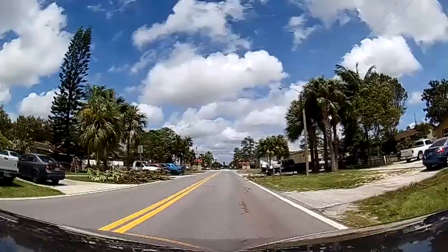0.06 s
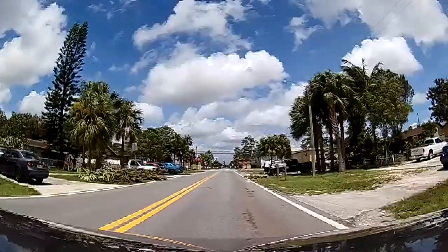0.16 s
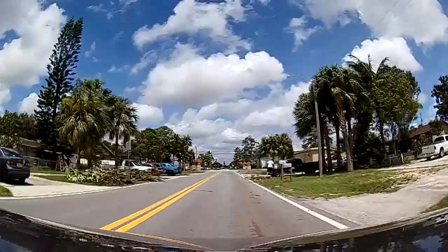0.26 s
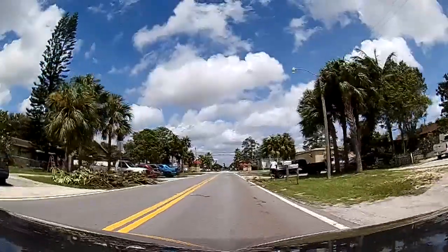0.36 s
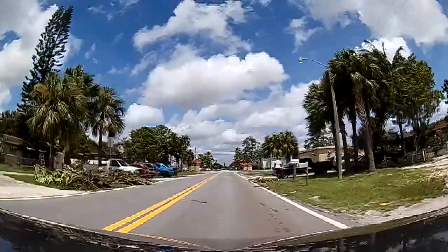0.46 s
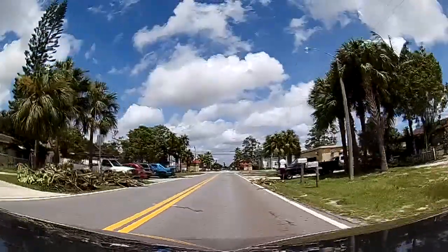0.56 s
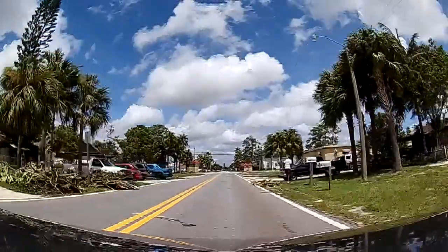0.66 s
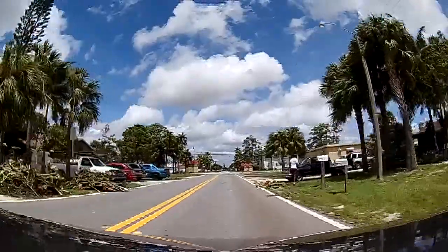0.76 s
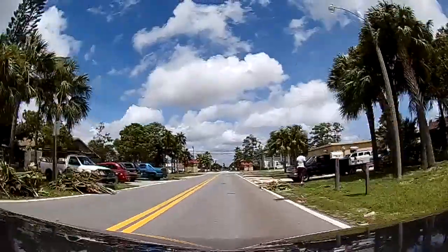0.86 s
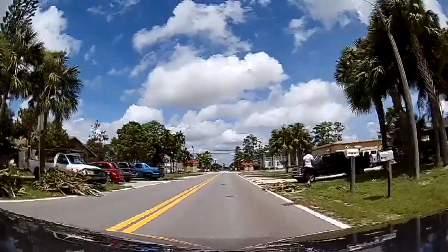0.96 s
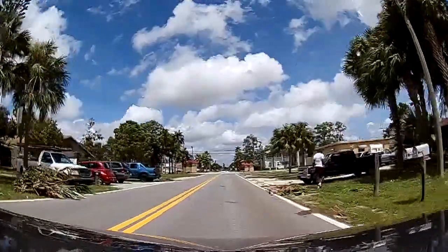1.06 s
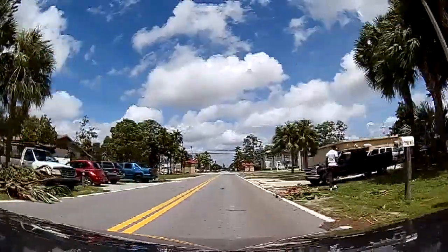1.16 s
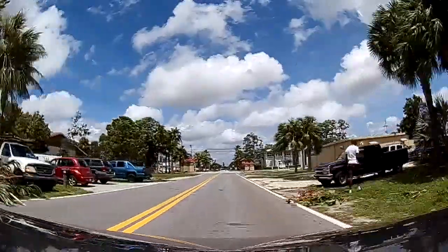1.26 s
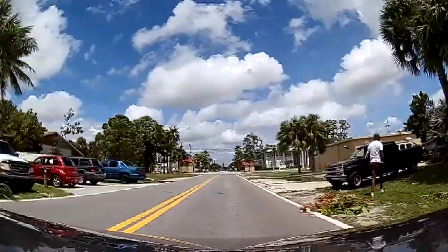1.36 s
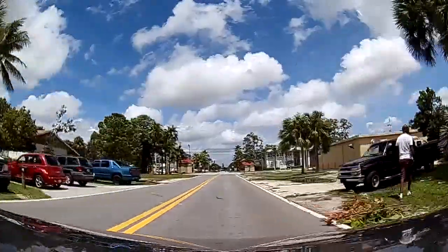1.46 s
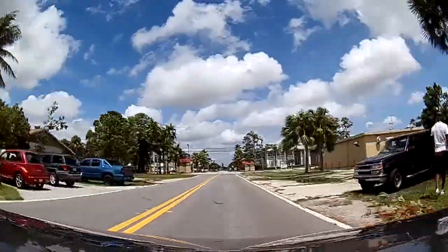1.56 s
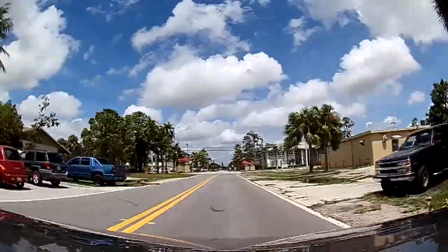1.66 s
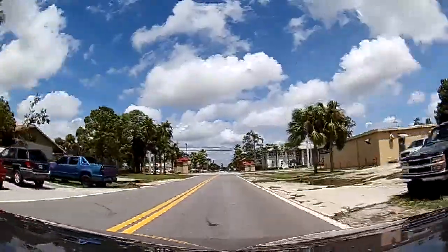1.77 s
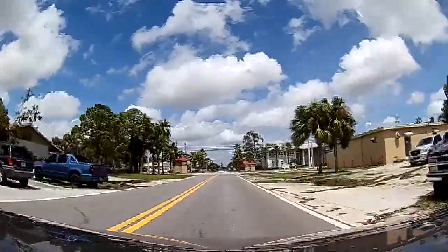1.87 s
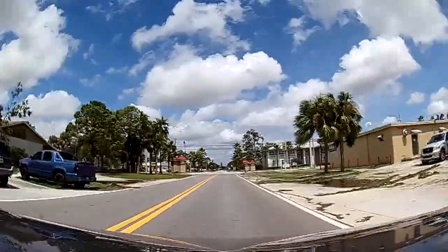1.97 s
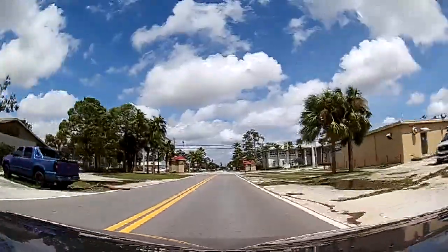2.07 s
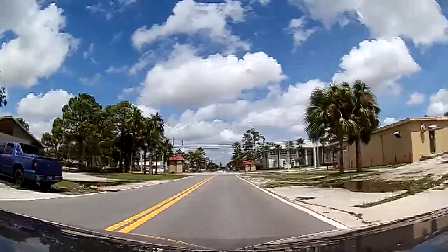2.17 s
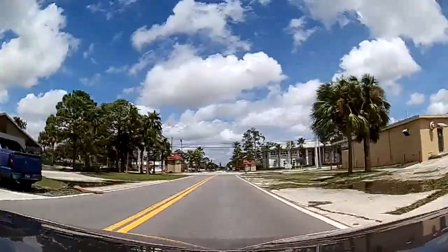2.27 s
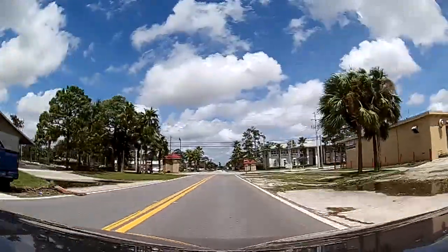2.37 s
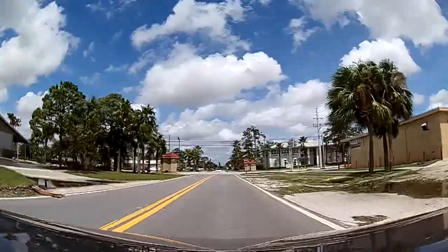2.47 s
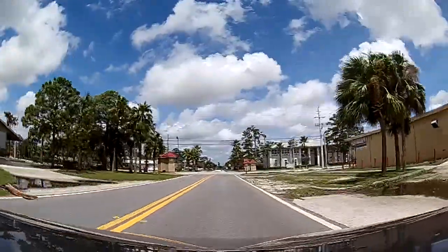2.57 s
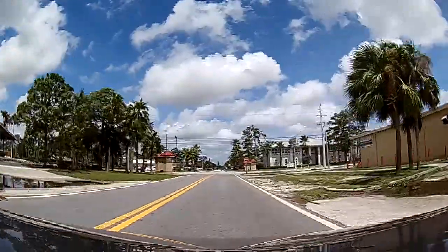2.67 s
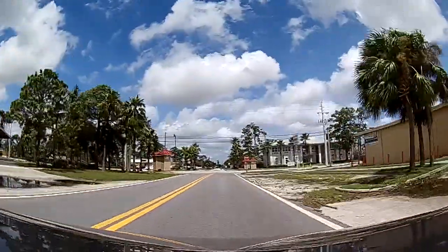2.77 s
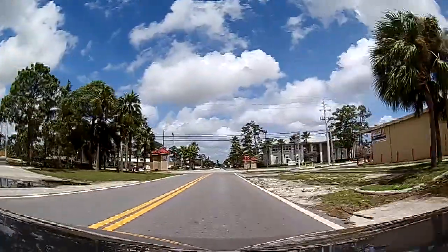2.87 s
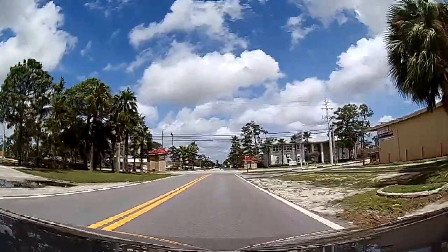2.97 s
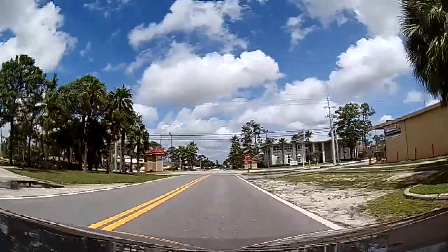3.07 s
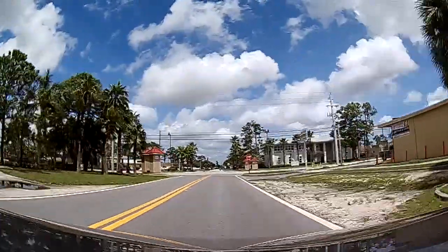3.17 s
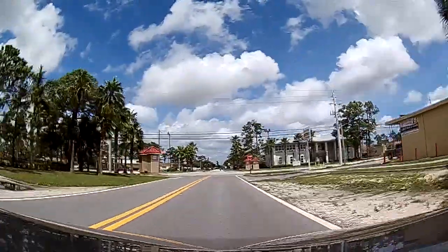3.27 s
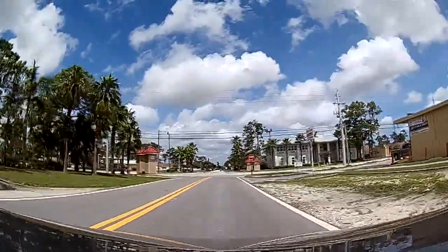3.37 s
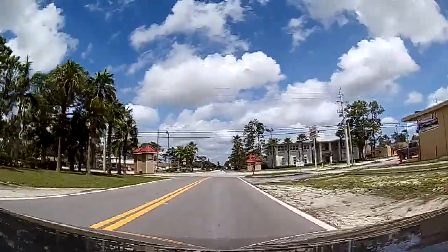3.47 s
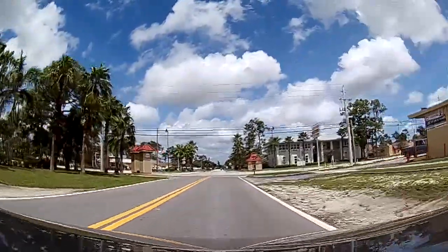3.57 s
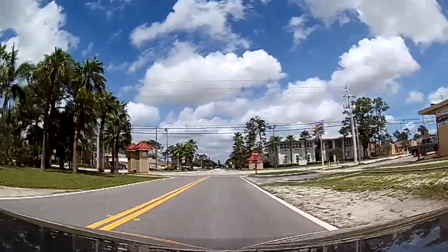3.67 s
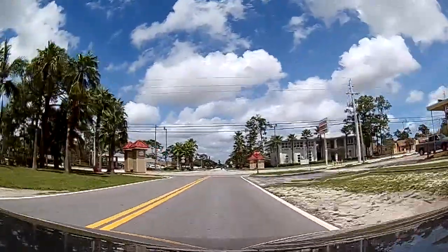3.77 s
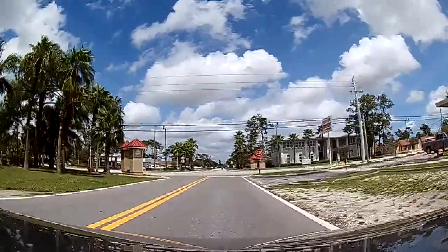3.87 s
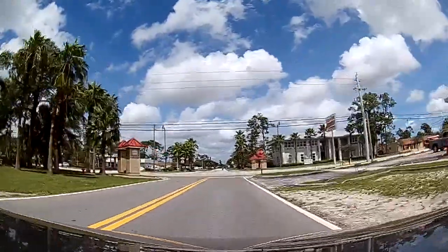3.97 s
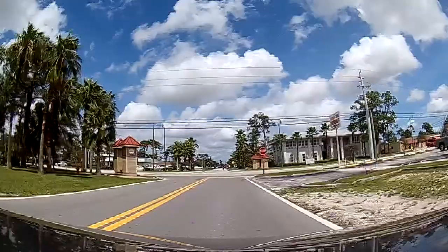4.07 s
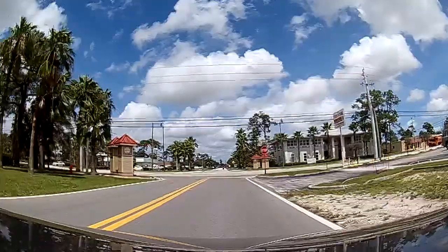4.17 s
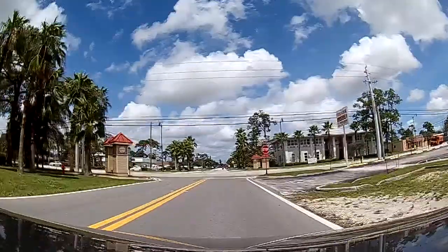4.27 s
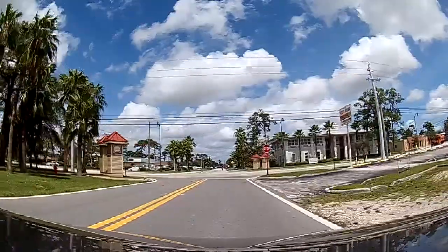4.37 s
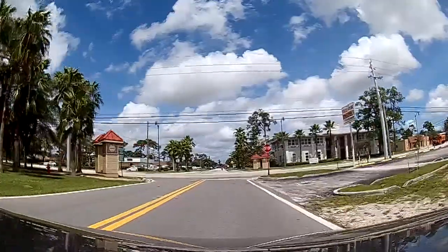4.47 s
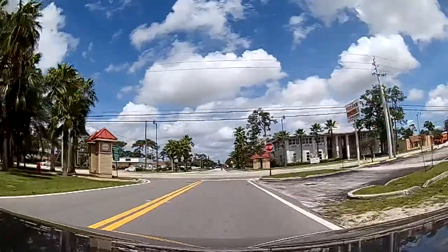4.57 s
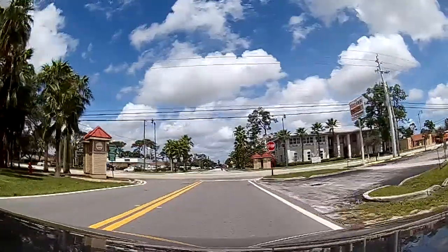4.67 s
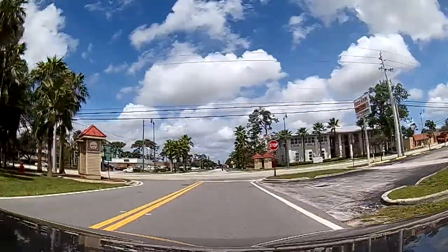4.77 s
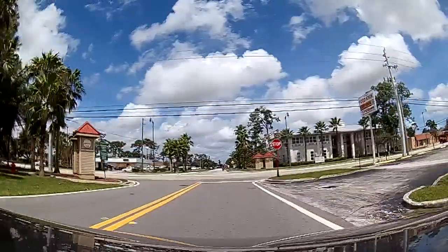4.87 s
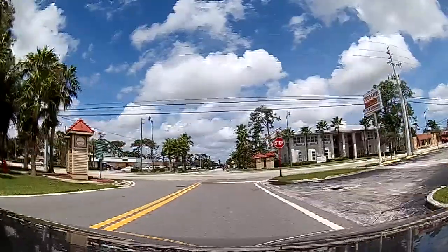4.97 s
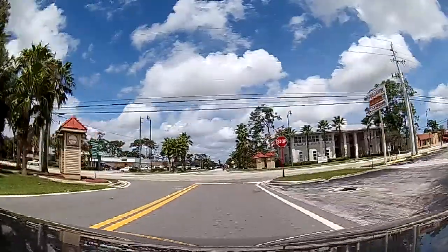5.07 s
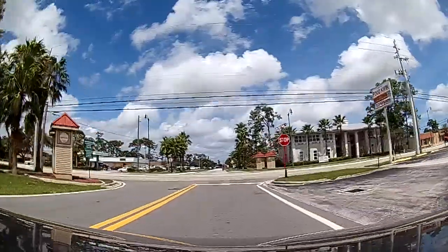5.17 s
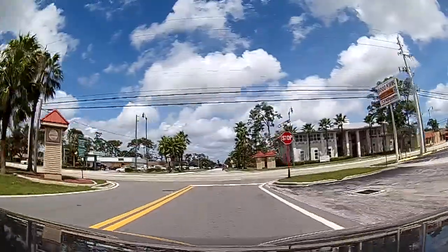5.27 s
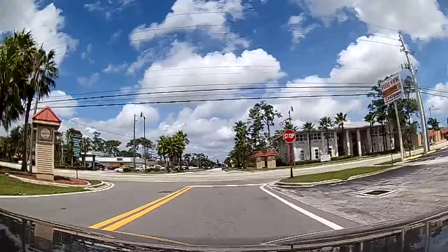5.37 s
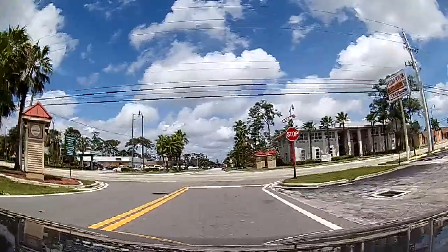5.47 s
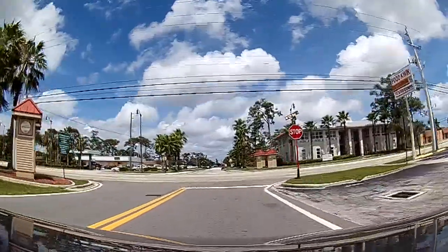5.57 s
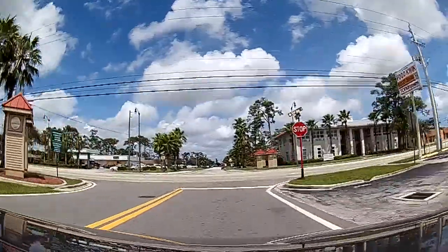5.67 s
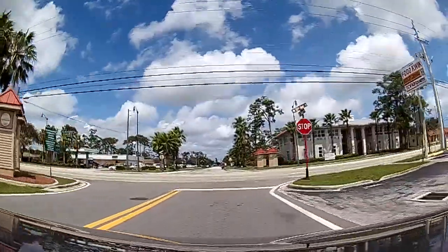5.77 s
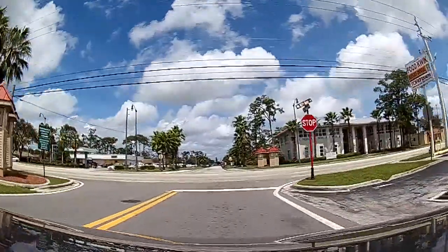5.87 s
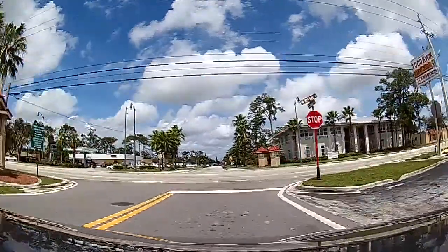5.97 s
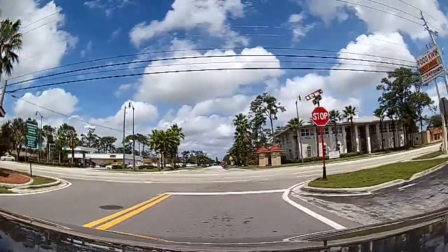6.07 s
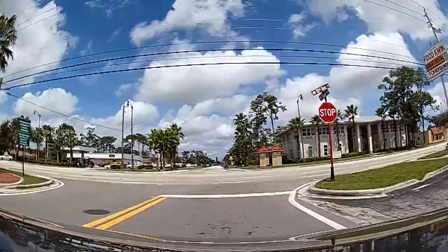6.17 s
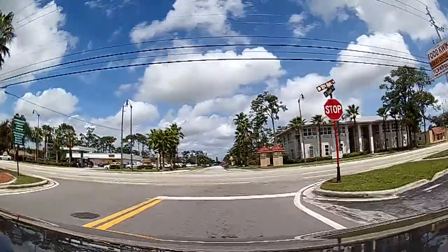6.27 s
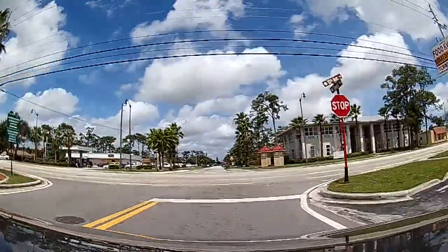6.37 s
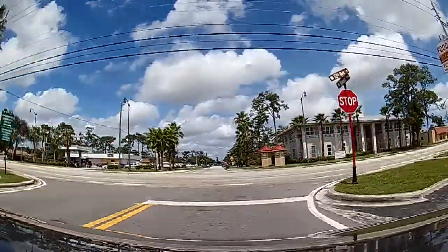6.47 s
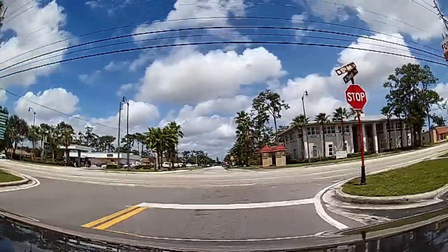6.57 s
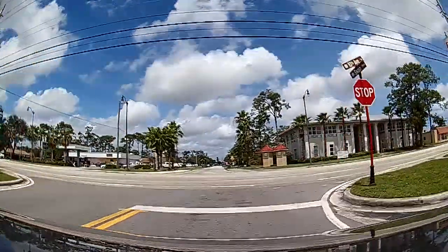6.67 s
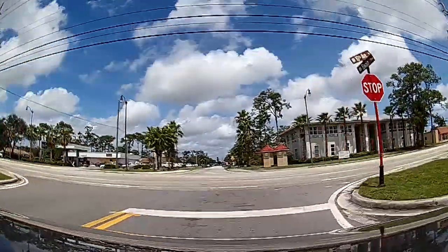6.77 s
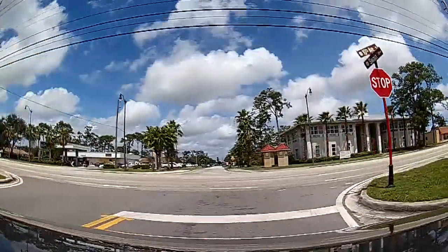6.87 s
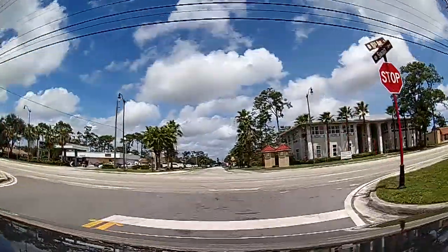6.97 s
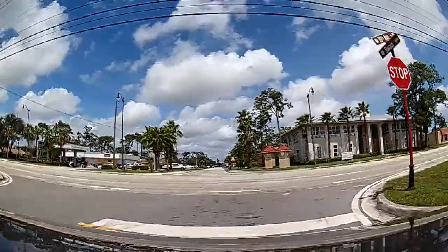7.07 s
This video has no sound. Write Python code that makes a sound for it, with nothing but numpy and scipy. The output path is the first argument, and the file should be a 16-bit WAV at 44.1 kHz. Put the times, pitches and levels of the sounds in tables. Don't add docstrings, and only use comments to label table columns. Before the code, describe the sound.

Heard from a dashboard microphone inside a car: a very deep, uneven boom pulses with the street while wheels thud over seams and tyres roar dully. Faint hums fade after braking begins around three seconds. Small plastic ticks and a tiny brake squeak follow, then the rumble thins, leaving vent air and soft hiss.

```python
import sys
import numpy as np
from scipy import signal
from scipy.fft import rfft, irfft
from scipy.io import wavfile
from scipy.ndimage import uniform_filter1d

SR = 44100
rng = np.random.default_rng(int(sys.argv[2]) if len(sys.argv) > 2 else 0)


def pcm_store(signal):
    levels = np.round(np.clip(np.atleast_2d(signal), -1, 1) * 32767)
    wavfile.write(sys.argv[1], SR, levels.astype(np.int16).T)


def volts(x):
    e = np.asarray(x, float) / 20
    return 10 ** e


N = 314423


def evened(x):
    return x / np.sqrt(np.mean(x ** 2) + 1e-20)


def curves(rows):
    seconds, *columns = np.transpose(rows)
    return [np.interp(np.arange(N) / SR, seconds, column) for column in columns]


def drift(samples):
    once = uniform_filter1d(rng.standard_normal(N), samples)
    return evened(uniform_filter1d(once, samples))


def hump(peak_s, rise_s, fall_s):
    late = np.arange(N) / SR - peak_s
    return np.exp(-0.5 * (late / np.where(late < 0, rise_s, fall_s)) ** 2)


def tone(hz, db):
    cycles = np.cumsum(hz * np.ones(N)) / SR
    return np.sqrt(2) * volts(db) * np.sin(2 * np.pi * (cycles + rng.random()))


def noise(shape, patchy_db):
    hz, t, z = signal.stft(rng.standard_normal(N), SR, nperseg=512)
    patches = uniform_filter1d(rng.standard_normal(z.shape), 6, 0)
    patches = evened(uniform_filter1d(patches, 8, 1))
    white = signal.istft(z * volts(patchy_db * patches), SR, nperseg=512)[1][:N]
    return evened(irfft(rfft(white) * shape(np.fft.rfftfreq(N, 1 / SR)), N))


def resonant_noise(modes, steep, patchy_db):
    def shape(hz):
        return np.sqrt(sum(volts(db) ** 2 / (1 + (2 * (hz - f) / width) ** 2) ** steep
                           for f, width, db in modes))
    return noise(shape, patchy_db)


def spectrum_noise(points, patchy_db):
    f, db = np.transpose(points)

    def shape(hz):
        return volts(np.interp(np.log(hz + 1), np.log(f + 1), db, left=-120, right=-120))
    return noise(shape, patchy_db)


# time in seconds, share of cruising speed from 0 to 1.
ROAD_SPEED = [(0, 1), (2.95, 1), (3.1, .953), (3.6, .76), (3.82, .717), (4.2, .645), (4.6, .596),
              (4.95, .572), (5.4, .523), (6.2, .435), (7.13, .4)]


def halvings():
    return -np.log2(curves(ROAD_SPEED)[0])


# peak in seconds, level in dB, release in seconds, pitch in Hz.
AIR_SWELLS = [(.095, -2.5, 0.051, 36.84), (.25, -11, 0.098, 36.86), (.4, -6.5, .11, 37.47),
              (.67, -5, 0.18, 37.2), (.95, -8, 0.17, 36.93), (1.24, -6.5, 0.25, 37.9),
              (1.63, -4, .13, 36.7), (1.97, -8, 0.089, 38), (2.16, -15, 0.025, 39.98),
              (2.24, -15, 0.037, 41.25), (2.49, -3, 0.12, 38.5), (2.7, -9.5, 0.13, 38.06),
              (2.88, -25, 0.018, 38.5), (3.04, -7.5, 0.071, 39.5), (3.25, -6.5, 0.049, 39.12),
              (3.39, -6, 0.058, 39.8), (3.71, -17, 0.02, 41.76), (3.83, -15, 0.027, 41.77),
              (3.94, -8.5, 0.077, 40.3), (4.2, -12, 0.052, 40.9), (4.43, -16.5, 0.097, 41.03),
              (4.68, -16.5, 0.063, 39), (4.91, -28, 0.085, 39.74), (5.13, -22, 0.048, 40.5),
              (5.54, -20, 0.14, 41.38), (5.9, -23, 0.022, 43.26), (6.06, -18, 0.021, 41.6),
              (6.24, -17, 0.056, 39.74), (6.5, -26, .12, 40.5), (6.84, -12, 0.058, 43.46)]


def boom():
    powers = [volts(db) ** 2 * hump(s, 0.055, release_s) ** 2 + 1e-9
              for s, db, release_s, hz in AIR_SWELLS]
    total = sum(powers)
    hz = sum(power * row[3] for power, row in zip(powers, AIR_SWELLS)) / total
    hz = uniform_filter1d(hz, 1500) + 1.3 * drift(3000)
    rest = volts(-22 - 5.6 * halvings())
    level = np.sqrt(total + rest ** 2)
    return tone(hz, 0) * np.minimum(level, volts(-4.5))


# time in seconds, half length in seconds, jolt to floor in dB, jolt to doors in dB.
ROAD_BUMPS = [(0.057, 0.1, 6, 4), (0.217, .03, 0.5, 2), (0.578, .07, 2, 6), (.93, .04, 1.5, 3.5),
              (1.467, 0.055, 4, 0.5), (1.869, 0.063, 0, 2.5), (2.22, 0.028, 7, 4), (2.34, 0.022, 5, 3),
              (2.82, 0.068, 5, 1), (2.92, 0.041, 1.5, 4.5), (3.08, 0.051, 8, 3.5), (3.251, 0.054, 4.5, 9),
              (3.671, 0.13, 2, 4), (3.904, .06, 5.5, 2), (4.1, 0.038, 3, 4.5), (4.326, 0.044, 4.5, 5.5),
              (4.575, 0.044, 1.5, 1), (4.9, 0.16, 0.5, 2), (5.422, 0.026, 7, 3), (5.556, .12, -3, 4.5),
              (5.68, 0.041, 5.5, 2), (5.877, 0.13, -2, 5), (5.96, 0.034, 5, -2.5), (6.24, .05, 4, 4.5),
              (6.603, .2, 0, -3), (6.75, 0.069, 2, -1.5)]
# pitch in Hz, width in Hz, level in dB.
SUSPENSION_MODES = [(28.8, 8.9, -1.5), (44.9, 7.3, 2), (54.47, 4.2, 4), (67.6, 25, -10.5)]
FLOOR_PAN_MODES = [(97.6, 43, -4), (146.5, 35, -2), (172.8, 28.2, -0.5)]
DOOR_PANEL_MODES = [(235.2, 20.5, -2), (264, 20.3, -1), (307, 54, -12.5), (368.3, 28, -10.5)]
# pitch in Hz, width in Hz, level in dB.
HOUSING_MODES = [(516, 136, -11), (607, 67, -9.5), (793, 156, -14.5), (1198.4, 74, 0), (1321, 262, -1.5),
                 (1745, 145, -7), (2138, 420, -21), (2685, 380, -25.5), (3140, 650, -25.5)]


def road():
    floor_db, door_db = sum(np.outer(jolts_db, hump(s, half_s, half_s))
                            for s, half_s, *jolts_db in ROAD_BUMPS)
    slowing = halvings() ** 1.21

    def shaken_db(jolt_db, cruise_db, loss_db, share, lumpy_db):
        return cruise_db - loss_db * slowing + share * jolt_db + lumpy_db * drift(2500)

    suspension_db = shaken_db(floor_db, cruise_db=-23, loss_db=5.5, share=0.3, lumpy_db=-1.4)
    pan_db = shaken_db(floor_db, cruise_db=-33.5, loss_db=3, share=1.04, lumpy_db=0.9)
    panel_db = shaken_db(door_db, cruise_db=-42, loss_db=3.5, share=1.03, lumpy_db=1)
    tyre_db = shaken_db(floor_db, cruise_db=-30.5, loss_db=10.5, share=-0.0847, lumpy_db=0.5)
    suspension_db = uniform_filter1d(suspension_db, 9000) + 8.5 * hump(7.05, 0.17, 0.17)
    tyre_db = tyre_db + 2 * hump(4.22, 0.17, 0.17)

    thuds = volts(suspension_db) * resonant_noise(SUSPENSION_MODES, 2.86, 0.1)
    pan = volts(pan_db) * resonant_noise(FLOOR_PAN_MODES, 1.24, 0.8)
    panels = volts(panel_db) * resonant_noise(DOOR_PANEL_MODES, 1.21, 0.54)
    roar = volts(tyre_db) * resonant_noise(HOUSING_MODES, 1.64, 0.93)
    return thuds + pan + panels + roar


def wavering(hz, db):
    return tone(hz + 2.46 * drift(2500), db + 2.33 * drift(2000))


# time in seconds, gain in dB, half length in seconds.
TREAD_RESONANCES = [
    (1.5, 4, .15),
    (2.9, 3, .2),
    (3.79, 17, .06),
    (4.68, 23, .12),
    (4.98, 22, .12),
]


def tread():
    flare_db = sum(db * hump(s, half_s, half_s) for s, db, half_s in TREAD_RESONANCES)
    db = -42.5 - 45 * halvings() + flare_db
    return wavering(1263 * curves(ROAD_SPEED)[0], db)


# starting pitch in Hz, sag in Hz per second, level in dB, start of fade in seconds.
DRIVELINE_HUMS = [
    (180.1, 2.8, -37, 2.4),
    (487.8, 4.4, -49, 2.3),
    (1080, 5.1, -52, 2.6),
]


def driveline():
    t = np.arange(N) / SR
    out = np.zeros(N)
    for hz, sag, db, fade_s in DRIVELINE_HUMS:
        fade_db = 27.5 * np.maximum(t - fade_s, 0)
        out += wavering(hz - sag * t, db - fade_db)
    return out


# time in seconds, pitch in Hz, level in dB.
BRAKE_SQUEAK = [
    (4.295, 5920, -92),
    (4.31, 5900, -67),
    (4.35, 5854, -69),
    (4.37, 5855, -95),
]


def brake():
    hz, db = curves(BRAKE_SQUEAK)
    hz = hz + 40 * drift(150)
    return tone(hz, db) + tone(2.05 * hz, db + 2)


# start in seconds, ring level in dB, ring pitch in Hz,
# time for the ring to fall 60 dB in seconds, snap level in dB.
TRIM_TICKS = [(1.627, -48, 2500, 0.028, -39), (3.01, -26, 3405, 0.025, -59), (3.012, -56, 4750, 0.052, -56),
              (3.027, -40, 3560, 0.017, -58), (3.035, -33, 3380, 0.011, -58),
              (3.043, -42, 3620, 0.019, -58), (3.102, -48, 3170, 0.043, -39),
              (3.142, -56, 4450, 0.026, -58), (3.207, -46, 3120, 0.071, -39), (3.876, -44, 3240, 0.03, -34),
              (4.1181, -44, 3247, .03, -37), (4.122, -45, 3500, 0.036, -58), (4.8913, -46, 3260, 0.02, -35),
              (4.896, -34, 1278, .03, -58)]


def trim():
    out = np.zeros(N)
    t = np.arange(3000) / SR
    band = signal.butter(5, [1000, 3900], "bandpass", fs=SR, output="sos")
    raw = uniform_filter1d(rng.standard_normal((len(TRIM_TICKS), len(t) + 500)), 9)
    snaps = evened(signal.sosfilt(band, raw)[:, 500:])
    for (s, db, hz, t60, snap_db), snap in zip(TRIM_TICKS, snaps):
        ring_level = np.minimum(t / 0.0012, 1) * volts(db - 60 * (t / t60) ** 2)
        snap_level = np.minimum(t / 0.0063, 1) * volts(snap_db - 19 * (t / 0.015) ** 2)
        place = out[round(s * SR):][:len(t)]
        place += ring_level * np.sin(2 * np.pi * hz * t) + snap_level * snap
    return out


# frequency in Hz, level in dB per Hz.
VENT_SPECTRUM = [(180, -32.5), (300, -2), (337, -7), (573, -5.5), (907, -9), (1220, -7.5), (1580, -13.5),
                 (1800, -6.5), (2000, -14), (2190, -14.5), (3160, -18), (4190, -34), (5000, -26),
                 (6500, -53), (11000, -120)]


def vent():
    return volts(-47) * spectrum_noise(VENT_SPECTRUM, 0.6)


# frequency in Hz, level in dB per Hz.
HISS_SPECTRUM = [(2500, -34), (3500, -2), (3900, -1), (5150, -5), (5800, -3.5), (7080, -6), (11000, -7.5),
                 (12100, -7.5), (13000, -8.5), (16500, -10)]
# pitch in Hz, level in dB.
WHINE_TONES = [(15202, -88), (15299, -84.5), (15392, -93)]


def electronics():
    hiss = volts(-58.5) * spectrum_noise(HISS_SPECTRUM, 0.61)
    return hiss + sum(tone(hz, db) for hz, db in WHINE_TONES)


def scene():
    car = boom() + road() + tread() + driveline() + brake() + trim()
    return (car + vent() + electronics())[None]


# centre in seconds, edge in Hz, share lost from 0 to 1, pitch in
# Hz of a thin tone sounding meanwhile or 0 for none.
TREBLE_LOSSES = [(.158, 4000, 1, 3500), (.350, 4000, 1, 0), (.841, 4000, 1, 0), (1.076, 4100, 1, 0),
                 (1.780, 4000, 1, 0), (2.526, 4000, 1, 0), (3.420, 4000, .7, 0), (3.722, 3800, 1, 4500),
                 (3.785, 4300, .97, 4900), (4.148, 4200, 1, 3900), (4.211, 3600, .95, 6800),
                 (4.830, 3900, 1, 4500), (5.213, 4500, .7, 0), (5.855, 4500, 1, 4000),
                 (6.153, 4500, .75, 0), (6.472, 4200, .95, 4700), (6.536, 4200, 1, 4800),
                 (6.794, 4000, 1, 6300), (6.804, 4000, 1, 11600), (6.813, 4000, 1, 9400),
                 (6.857, 4000, .7, 5800), (6.858, 6000, .6, 7600)]


def starve(x):
    hz, t, z = signal.stft(x, SR, nperseg=256, noverlap=192)
    time = np.arange(N) / SR
    stray = np.zeros(N)
    for s, edge_hz, share, stray_hz in TREBLE_LOSSES:
        window = np.cos(np.pi * np.clip((t - s) / 0.033, -0.5, 0.5)) ** 2
        treble = np.clip((hz - edge_hz) / 300 + 0.5, 0, 1)
        z = z * (1 - np.outer(treble, share * window))
        line = volts(-62.5) * np.sin(2 * np.pi * stray_hz * time)
        stray += np.interp(time, t, window) * line
    return signal.istft(z, SR, nperseg=256, noverlap=192)[1][:, :N] + stray


def low_pass(x):
    return signal.sosfilt(signal.butter(12, 15670, fs=SR, output="sos"), x)


# time in seconds, level in dB.
WAKE_CLICKS = [
    (0.0001, -22),
    (.026, -35),
]


def record(dry):
    opened = dry * np.minimum(np.arange(N) / 200, 1)
    for s, db in WAKE_CLICKS:
        opened[:, round(s * SR)] += volts(db)
    mix = starve(np.clip(opened, -1, 1))
    return low_pass(mix)


dry = scene()
out = record(dry)
pcm_store(out)
```